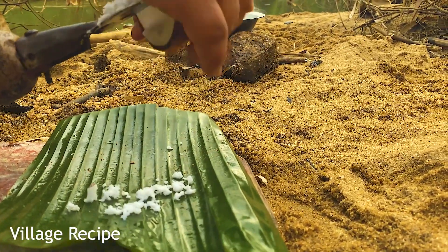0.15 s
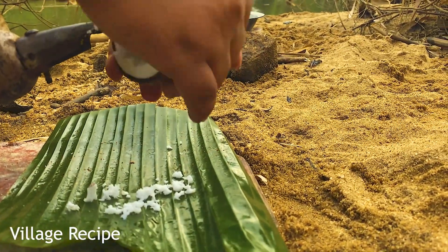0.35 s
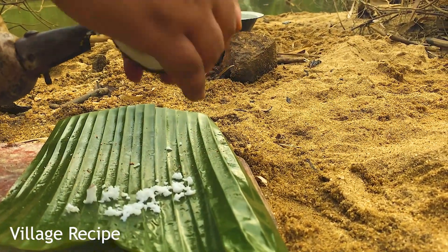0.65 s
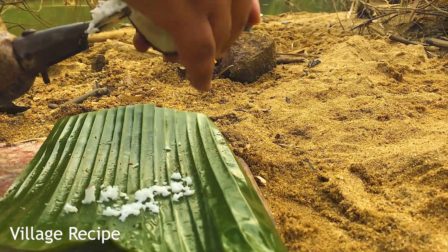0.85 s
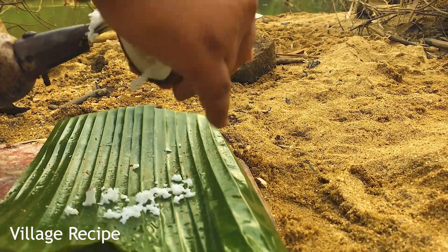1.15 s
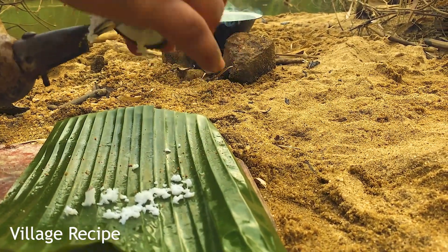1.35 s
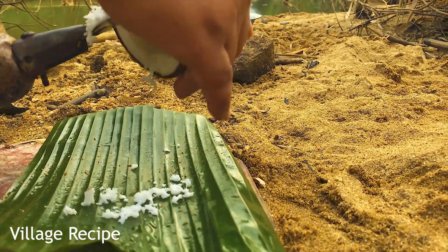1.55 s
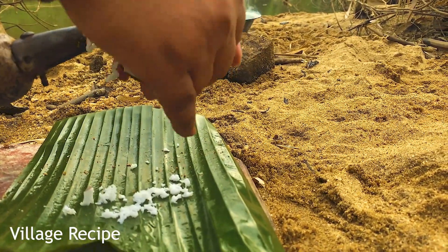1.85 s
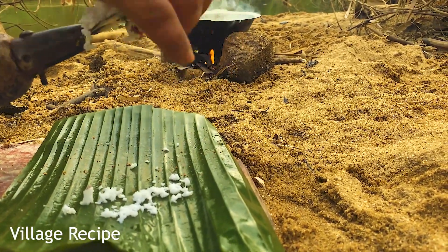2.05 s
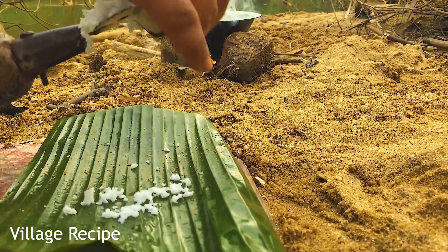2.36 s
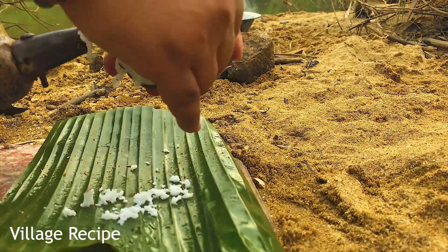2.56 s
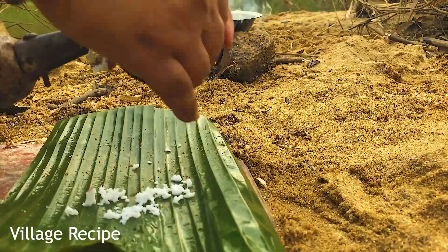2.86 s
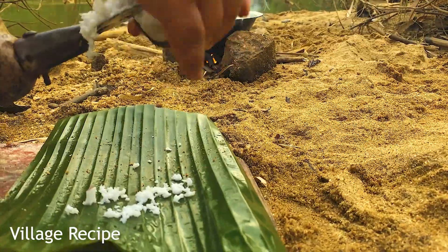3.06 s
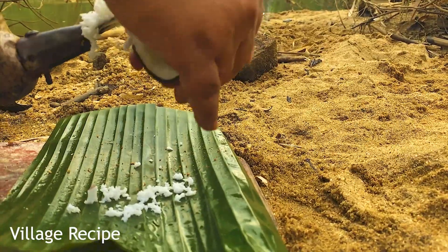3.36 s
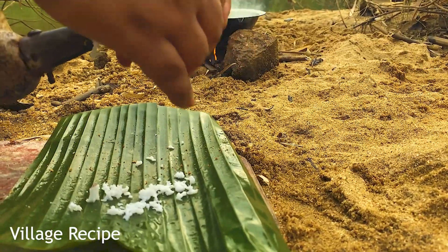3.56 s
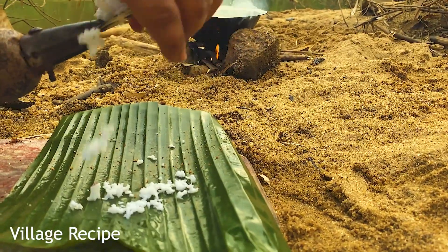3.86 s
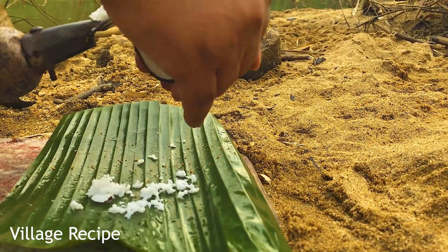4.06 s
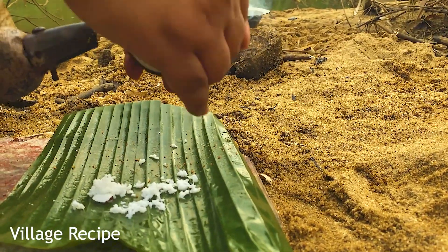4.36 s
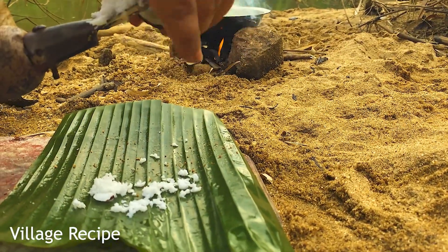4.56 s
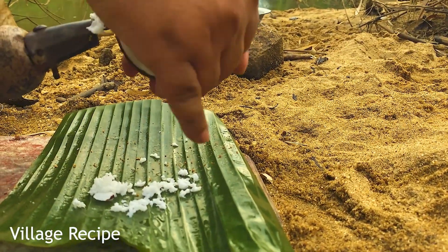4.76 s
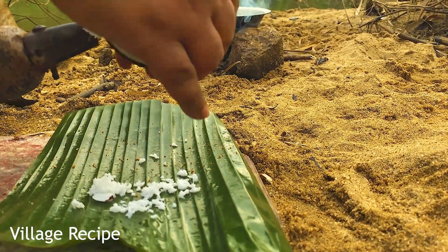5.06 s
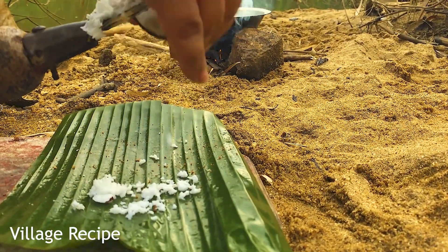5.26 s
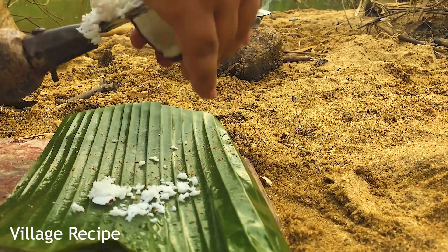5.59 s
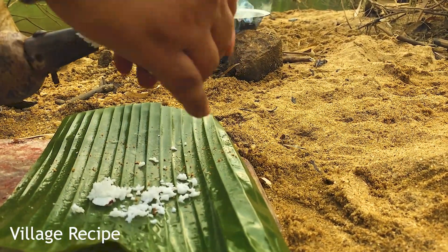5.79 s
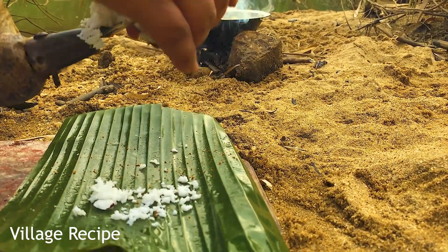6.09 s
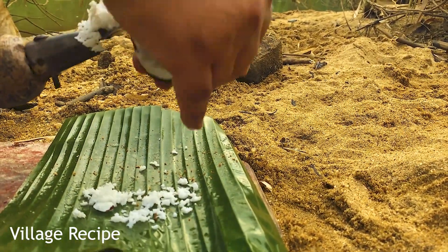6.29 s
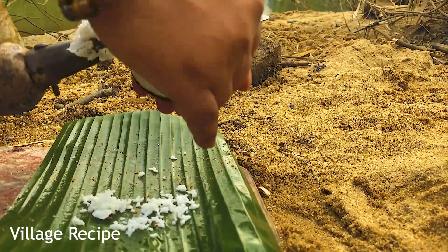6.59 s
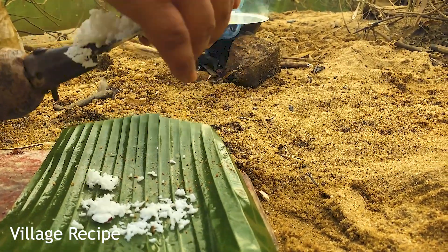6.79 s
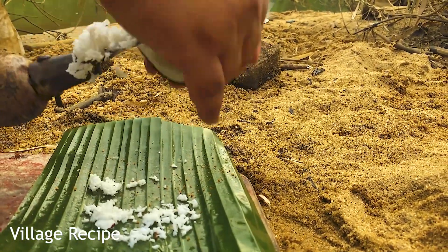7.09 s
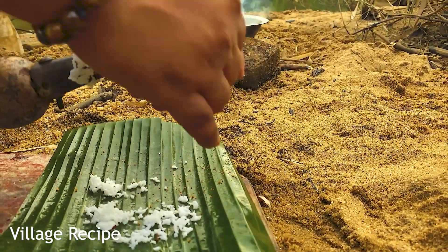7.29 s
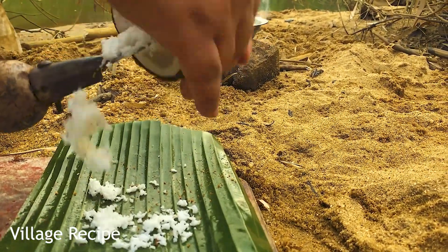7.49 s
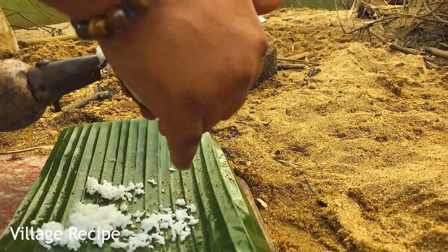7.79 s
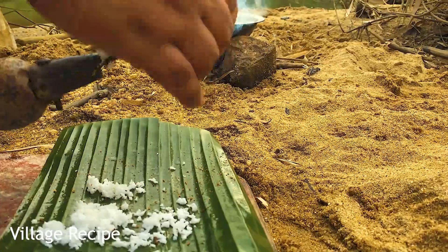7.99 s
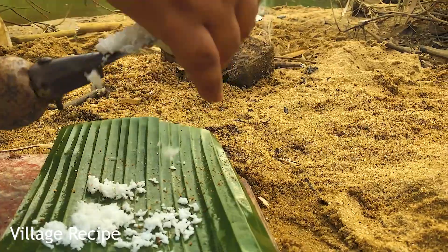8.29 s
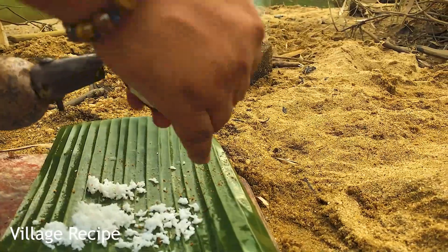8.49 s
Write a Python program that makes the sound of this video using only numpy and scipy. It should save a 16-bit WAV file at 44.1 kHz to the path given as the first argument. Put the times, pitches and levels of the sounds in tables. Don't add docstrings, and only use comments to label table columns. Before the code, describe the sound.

Close to the microphone outdoors, a coconut half is pushed again and again over a fixed serrated steel scraper. Each short stroke bites, swells in a hollow, juddering woody scrape with a gritty rasp, then lifts off. Nearly three strokes come each second, with faint grazes, crumb ticks and dull stool thuds in the gaps. A sharp snap lands just before four seconds; the air behind is almost silent.

```python
import sys
import numpy as np
from scipy import signal
from scipy.fft import rfft, irfft
from scipy.io import wavfile

SR = 44100
rng = np.random.default_rng(int(sys.argv[2]) if len(sys.argv) > 2 else 0)


def rack_gain(trim_db):
    fader = np.asarray(trim_db, float)
    return 10 ** (fader / 20)


def generate_wav(sig):
    pcm = np.round(np.clip(np.atleast_2d(sig).T, -1, 1) * 32767).astype(np.int16)
    wavfile.write(sys.argv[1], SR, pcm)


N = 381024

# bite_s, landing_s, rise_s, fade_s, full_force_db
STROKES = [(.005, 0.04, 0.011, 0.1, -17), (.357, 0.005, 0.037, 0.089, -15), (.718, .003, .039, 0.079, -14),
           (1.072, 0.0047, 0.069, 0.061, -13.5), (1.449, .003, 0.055, 0.06, -14.5),
           (1.807, .017, 0.051, 0.074, -16), (2.175, 0.021, 0.055, 0.07, -16.5),
           (2.55, 0.022, 0.027, 0.082, -13.5), (2.91, 0.027, 0.029, 0.086, -12.5),
           (3.259, .004, .082, 0.064, -16.5), (3.611, 0.013, 0.1, 0.029, -16),
           (3.988, 0.023, 0.092, 0.047, -16), (4.352, 0.01, 0.044, 0.1, -15),
           (4.725, 0.006, 0.069, 0.06, -14.5), (5.086, 0.014, 0.045, 0.092, -15),
           (5.456, 0.014, 0.083, .04, -12.5), (5.819, .003, 0.063, 0.085, -15.5),
           (6.202, .025, 0.039, 0.066, -11.5), (6.562, 0.018, 0.043, .082, -12),
           (6.938, 0.019, 0.049, 0.08, -13), (7.323, 0.0097, 0.061, 0.052, -14),
           (7.718, 0.033, 0.029, 0.08, -13), (8.088, 0.023, 0.055, 0.07, -13.5),
           (8.482, 0.027, 0.029, 0.12, -14.5)]
# start_s, boom_peak_db, rasp_peak_db
HARD_CATCHES = [(.381, -28, -29.5), (.736, -3.5, -31.5), (0.746, -4.5, -35.5), (.758, -1.5, -39.5),
                (.779, -6, -16), (.82, -8, -29), (1.108, -6, -36.5), (1.141, -4.5, -30), (1.169, 0, -37),
                (1.49, -1.5, -11), (1.856, -9, -21.5), (1.889, -1.5, -21), (2.575, -11, -39.5),
                (2.606, -8, -22), (3.698, -1, -20.5), (4.059, -2, -28), (4.456, -8.5, -29.5),
                (4.784, -11.5, -27.5), (5.111, -7.5, -33.5), (5.559, -13, -14.5), (5.862, -0.5, -30.5),
                (5.888, -17, -9.5), (6.216, -10, -42), (6.229, -15, -14), (6.605, -6.5, -30.5),
                (6.978, -4.5, -29), (7.356, 0.5, -36.5), (7.721, 0.5, -38.5), (8.115, 4.5, -23.5),
                (8.154, -11.5, -27)]
# start_s, boom_peak_db, rasp_peak_db
SNAP = (3.7555, -1.5, -2.5)
BOOM_SHAPE_DB = [
    -57.5,
    -21.5,
    -6.5,
    0,
    -14,
    -47.5,
]
RASP_SHAPE_DB = [
    -52.5,
    -18,
    -8,
    -1,
    -15,
    -39.5,
]
# time_s, fizz_over_rasp_db, rasp_over_boom_db
DRYNESS = [(0, -5, -15), (.45, -15.5, -19.5), (.7, -19.5, -17.5), (2.5, -19.5, -17), (5.5, -25.5, -18),
           (6.2, -24.5, -16.5), (8.64, -36, -15)]
# mode_hz, width_hz, level_db, left_over_right_db
SHELL_MODES = [(152.3, 49, -12.5, 1.5), (250, 57, -5.5, 1.5), (378.3, 90.4, -0.5, 1.5), (505, 95, 0.5, 2.5),
               (632, 90, -4, 4.5), (754, 180, -8.5, 4), (924.5, 150, -12.5, 8), (1076, 43, -19.5, 9),
               (1310, 220, -10.5, 0.5), (1445, 360, -12, -1.5), (1800, 130, -11.5, 3)]
# mode_hz, width_hz, level_db, left_over_right_db, port_likeness
BLADE_MODES = [(2280, 410, 0, -3, 0.14), (2870, 150, -3, 15, 0.18), (3332, 300, 4.5, 4.5, 0.16),
               (4100, 300, 4, 2.5, 0.2), (4733, 350, 1, 4, .4), (5600, 590, -4.5, -5, .4),
               (6384, 500, -8, -4.5, 0.99), (7155, 370, -4.5, -4.5, 0.94), (7700, 500, -10, -4, 0.86),
               (8540, 1500, -15, -2, 0.93), (10540, 540, -22.5, -4.5, 0.72), (11400, 3300, -27, -2, .8)]
# mode_hz, width_hz, level_db
GRAZE_MODES = [(620, 900, 3), (1030, 73, 4), (1800, 220, 2), (3200, 240, 2), (4100, 380, -3.5),
               (5200, 1800, -13), (7200, 900, -22)]
# start_s, peak_db, pitch_hz
TICKS = [(0.5773, -55, 1780), (0.863, -45, 1750), (1.696, -50, 1540), (1.703, -55, 3100),
         (1.739, -51, 1570), (1.957, -36.5, 4200), (2.4505, -58.5, 3100), (2.6933, -38.5, 1460),
         (2.7402, -50.5, 2440), (2.8, -54, 3280), (2.818, -42, 2340), (2.839, -57, 4020), (3.08, -58, 1200),
         (3.1883, -58.5, 3220), (4.2487, -63, 1227), (5.2587, -44, 2090), (5.3712, -45, 1210),
         (6.003, -40.5, 2870), (6.014, -43.5, 3200), (6.0845, -36.5, 1350), (6.4, -38.5, 1370),
         (6.81, -41.5, 2150), (7.2399, -59, 3180), (7.2781, -43, 3500), (7.543, -50, 2500),
         (7.5957, -47, 4100), (7.617, -44, 4090), (7.649, -41.5, 3230), (7.8644, -46, 1800),
         (8.041, -43.5, 4130)]
# start_s, peak_db, dying_s
BRUSHES = [(0.296, -45.5, 0.12), (0.64, -52.5, 0.09), (1.033, -42, 0.04), (1.3423, -51.5, 0.099),
           (1.3963, -34.5, 0.011), (1.96, -42, 0.045), (2.0242, -38, 0.022), (2.062, -43, 0.04),
           (2.45, -51, 0.027), (3.186, -63.5, 0.033), (3.5658, -48.5, 0.046), (3.934, -44.5, 0.057),
           (4.2837, -46.5, 0.04), (4.6399, -61, 0.04), (5.0006, -59.5, 0.05), (5.3594, -51, 0.061),
           (5.739, -41.5, 0.0096), (6.0959, -35.5, 0.014), (6.4412, -43, 0.046), (6.8109, -43, 0.04),
           (7.597, -46, 0.07), (7.99, -69, 0.041), (8.4183, -59, 0.04)]
# start_s, peak_db, pitch_hz
HAND_BUMPS = [
    (0.577, -46, 303),
    (0.616, -59, 250),
    (1.709, -34.5, 178),
    (2.027, -30.5, 426),
    (7.599, -45, 200),
    (7.842, -28, 75),
    (7.88, -42, 63.5),
]
# start_s, peak_db
THUDS = [(0.009, -27), (0.379, -52.5), (0.739, -31), (1.109, -34), (1.477, -33.5), (1.872, -17),
         (2.217, -26), (2.595, -29), (2.949, -39.5), (3.284, -48.5), (3.629, -48), (4.021, -51),
         (4.424, -44), (4.789, -42), (5.122, -41.5), (5.465, -43), (5.86, -26), (6.267, -33), (6.572, -46),
         (6.969, -40), (7.349, -41), (7.717, -32), (8.15, -34), (8.553, -30.5)]
# freq_hz, density_db_per_hz
AIR_SPECTRUM = [(18, -33), (30, -8.5), (75, 9.5), (485, -6.5), (794, -13.5), (1000, -14), (1520, -24),
                (2630, -26.5), (3320, -28.5), (7240, -39.5), (15000, -63.5)]

AIR_DB = -53
PORT_LAG_S = 0.00024
APPROACH_S, RELEASE_S = 0.053, 0.057
FORCE_LEAD_S = 0.003
BITE_BOOM_DB, BITE_RASP_DB, SOFT_LANDING_DB_PER_S = -2.5, 0.5, 400
CHANCE_CATCHES = 520
CHANCE_BOOM_DB, CHANCE_RASP_DB = 2.5, 5.5
CHANCE_BOOM_SPREAD_DB, CHANCE_RASP_SPREAD_DB = 2.5, 3.0


def rms_one(x):
    return x / np.sqrt(np.mean(x ** 2) + 1e-20)


def drift(rate_hz):
    settle = 4000
    r = np.exp(-2 * np.pi * rate_hz / SR)
    slow = signal.lfilter([1], [1, -2 * r, r * r], rng.standard_normal(N + settle))
    return rms_one(slow[settle:])


def resonance(x, hz, width_hz):
    r = np.exp(-np.pi * width_hz / SR)
    zeros = [(1 - r * r) / 2, 0, (r * r - 1) / 2]
    poles = [1, -2 * r * np.cos(2 * np.pi * hz / SR), r * r]
    return signal.lfilter(zeros, poles, x)


def double_resonance(x, hz, width_hz):
    return resonance(resonance(x, hz, width_hz), hz, width_hz)


def band(x, low_hz, high_hz, order=2):
    sos = signal.butter(order, [low_hz, high_hz], "band", fs=SR, output="sos")
    return signal.sosfilt(sos, x)


def soft(knocks, cut_hz):
    r = np.exp(-2 * np.pi * cut_hz / SR)
    return signal.lfilter([1 - r], [1, -r], knocks)


def sides(pan_db):
    return rack_gain(np.array([[pan_db / 2], [-pan_db / 2]]))


def late_right(x):
    n = np.arange(N)
    return np.array([x[0], np.interp(n - PORT_LAG_S * SR, n, x[1])])


def in_time(rows):
    time_s, *columns = np.transpose(rows)
    return [np.interp(np.arange(N) / SR, time_s, column) for column in columns]


def marks(times_s, levels_db):
    out = np.full(N, 1e-18)
    at = (np.asarray(times_s) * SR).astype(int)
    out[np.minimum(at, N - 1)] = rack_gain(levels_db)
    return out


def grains(per_s, spread_db):
    sizes = rack_gain(spread_db * np.minimum(rng.exponential(1, N), 5))
    signed = sizes * rng.choice([-1, 1], N)
    return rms_one(signed * (rng.random(N) < per_s / SR) + 1e-9)


def air():
    mid, side = rng.standard_normal((2, N))
    hz, level_db = np.transpose(AIR_SPECTRUM)
    bins_hz = np.fft.rfftfreq(N, 1 / SR)
    colour = rack_gain(np.interp(np.log(bins_hz + 1), np.log(hz), level_db))
    ports = mid + 0.26 * side * [[1], [-1]]
    return rack_gain(AIR_DB - 7.5) * rms_one(irfft(rfft(ports) * colour, N))


def ground(boom):
    rumble = rack_gain(-39.5 + 3.0 * drift(5))
    shaken = rng.standard_normal(N) * (boom + rumble)
    return rack_gain(-28.0) * resonance(shaken, 38, 40) * np.sqrt(SR / 80)


def bumps():
    length = 8000
    out, t = np.zeros(N + length), np.arange(length) / SR
    thuds = [(start_s, peak_db + 0.5, 62) for start_s, peak_db in THUDS]
    for start_s, peak_db, hz in list(HAND_BUMPS) + thuds:
        swell = 1 - np.exp(-t * hz * 8.1)
        ring = np.sin(2 * np.pi * hz * t) * np.exp(-t * hz / 2.0) * swell
        start = int(start_s * SR)
        out[start:start + length] += rack_gain(peak_db) * ring
    return out[:N]


def ticks():
    length = 900
    out, fade = np.zeros(N), np.exp(-np.arange(length) / (0.0037 * SR))
    for start_s, peak_db, hz in TICKS:
        puff = rng.standard_normal(length) * fade
        ring = resonance(resonance(puff, hz, 0.4 * hz), hz, 0.27 * hz)
        tick = ring + 0.58 * band(puff, 1100, 2900, order=3)
        start = int(start_s * SR)
        out[start:start + length] += rack_gain(peak_db + 3.0) * tick / np.abs(tick).max()
    return late_right(out * sides(6.5))


def brushes():
    envelope, t = np.zeros(N), np.arange(N) / SR
    for start_s, peak_db, dying_s in BRUSHES:
        at = slice(int(start_s * SR), int((start_s + 0.25) * SR))
        envelope[at] += rack_gain(peak_db - 14) * np.exp(-(t[at] - start_s) / max(dying_s, 0.005))
    force = grains(3600, spread_db=0.5) * envelope * rack_gain(3.5 * drift(40))
    out = sum(rack_gain(level_db) * double_resonance(force, hz, width_hz)
              for hz, width_hz, level_db in GRAZE_MODES)
    return late_right(rack_gain(14.5) * out * sides(4.7))


def fizz(envelope):
    dry_db = in_time(DRYNESS)[0]
    tearing = grains(4300, spread_db=3.5) + 0.55 * grains(6000, spread_db=4.0) * [[1], [-1]]
    hiss = rms_one(band(tearing, 7500, 11800, order=3))
    return rack_gain(dry_db + 5.2 * drift(29)) * envelope * hiss * sides(-1.5)


def blade(envelope, knocks):
    shared = grains(4000, spread_db=2.0) * envelope + knocks
    apart = grains(4000, spread_db=3.5) * envelope
    out, steady = 0, 0
    for k, (hz, width_hz, level_db, pan_db, alike) in enumerate(BLADE_MODES):
        alike = np.clip(alike, 0, 1)
        force = np.sqrt(1 + alike) * shared + np.sqrt(1 - alike) * apart * [[1], [-1]]
        force = force * rack_gain(3.0 * drift(18))
        steady += rack_gain(2 * level_db) * width_hz
        ring = double_resonance(force, hz, 1.48 * width_hz)
        out = out + (-1) ** k * rack_gain(level_db) * sides(pan_db) * ring
    return out / np.sqrt(steady * np.pi / SR)


def shell(envelope, knocks):
    force = grains(1500, spread_db=3.0) * envelope + knocks
    out, steady = 0, 0
    for k, (hz, width_hz, level_db, pan_db) in enumerate(SHELL_MODES):
        gain = (-1) ** k * rack_gain(level_db) / np.sqrt(width_hz)
        steady += gain * gain * width_hz
        gripped = force * rack_gain(1.52 * drift(8.55))
        out = out + gain * sides(pan_db) * resonance(gripped, hz, width_hz)
    return late_right(out) / np.sqrt(steady * np.pi / SR)


def pushes(shape_db):
    rows = []
    for bite_s, landing_s, rise_s, fade_s, full_db in STROKES:
        steps_s = [-landing_s - APPROACH_S - 0.03, 0.03, APPROACH_S, landing_s,
                   rise_s, fade_s, RELEASE_S, 0.04]
        times_s = bite_s - FORCE_LEAD_S + np.cumsum(steps_s)
        rows += zip(times_s, full_db + np.array([-80, *shape_db, -80]))
    return in_time(rows)[0]


def all_catches(boom_db, rasp_db):
    chance_s = rng.uniform(0, N / SR, CHANCE_CATCHES)
    here = (chance_s * SR).astype(int)
    boom_luck, rasp_luck = rng.standard_normal((2, CHANCE_CATCHES))
    lesser = [chance_s,
              boom_db[here] + CHANCE_BOOM_DB + CHANCE_BOOM_SPREAD_DB * boom_luck,
              rasp_db[here] + CHANCE_RASP_DB + CHANCE_RASP_SPREAD_DB * rasp_luck]
    bite_s, landing_s, _, _, full_db = np.transpose(STROKES)
    first_db = full_db - SOFT_LANDING_DB_PER_S * landing_s
    first = [bite_s - FORCE_LEAD_S, first_db + BITE_BOOM_DB, first_db - 27 + BITE_RASP_DB]
    return np.hstack([lesser, first, np.transpose(HARD_CATCHES)])


def catch_swells(at_s, levels_db, rise_s, decay_s):
    rise, fall = np.exp(-1 / (rise_s * SR)), np.exp(-1 / (decay_s * SR))
    poles = np.convolve([1, -rise], [1, -fall])
    return signal.lfilter([1 - rise], poles, marks(at_s, levels_db))


def scraping():
    boom_db = pushes(BOOM_SHAPE_DB)
    rasp_db = pushes(RASP_SHAPE_DB) + in_time(DRYNESS)[1]
    judder_db = 1.7 * drift(60)
    at_s, catch_boom_db, catch_rasp_db = all_catches(boom_db, rasp_db)

    jolts = catch_swells(at_s, catch_boom_db - 7.0, rise_s=0.00088, decay_s=0.0028)
    boom = rack_gain(boom_db + 3.5 + judder_db) + jolts
    bites = catch_swells(at_s, catch_rasp_db - 8, rise_s=0.00027, decay_s=0.0025)
    rasp = rack_gain(rasp_db - 1.5 + judder_db + 0.65 * drift(120)) + bites

    snap_s, snap_boom_db, snap_rasp_db = SNAP
    low_snap = marks([snap_s, snap_s + 0.00228], [snap_boom_db + 12, snap_boom_db + 9])
    high_snap = soft(soft(marks([snap_s], snap_rasp_db + 10), 2200), 2200)
    low_knocks = marks(at_s + 0.0015, catch_boom_db + 5.5) + low_snap
    high_knocks = marks(at_s + 0.001, catch_rasp_db + 3) + high_snap

    wood = band(shell(boom, low_knocks), 30, 2600)
    steel = band(blade(rasp, soft(high_knocks, 5000)), 1300, 11700, order=5)
    return wood + rack_gain(-3.0) * steel + fizz(0.8 * rasp + 0.4 * bites) + ground(boom)


def scene():
    return scraping() + ticks() + brushes() + bumps() + air()


def roll_off(x):
    return signal.sosfilt(signal.butter(12, 15730, fs=SR, output="sos"), x)


def record(dry):
    heard = band(band(dry, 72, 15000), 36, 14000)
    rounded = heard / (1 + np.abs(heard / 0.95) ** 4) ** 0.25
    return roll_off(rounded)


dry = scene()
out = record(dry)
generate_wav(out)
```